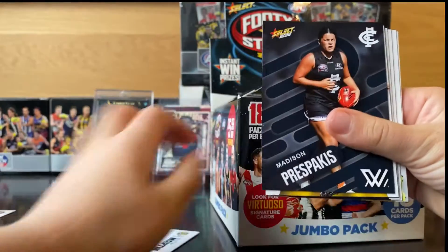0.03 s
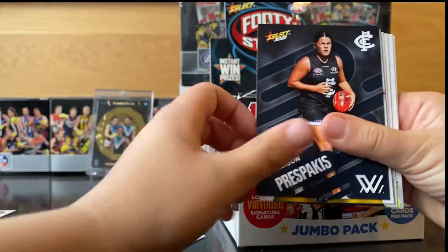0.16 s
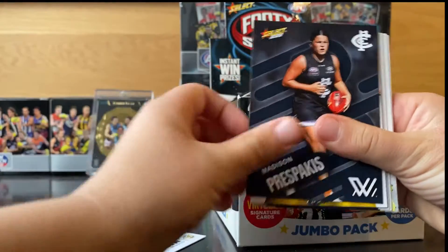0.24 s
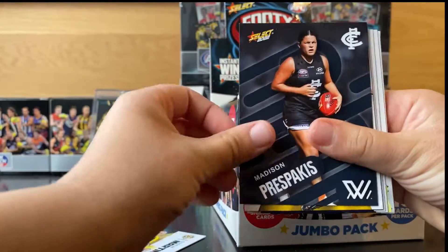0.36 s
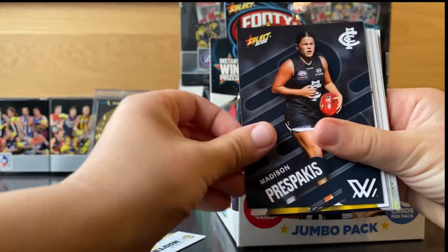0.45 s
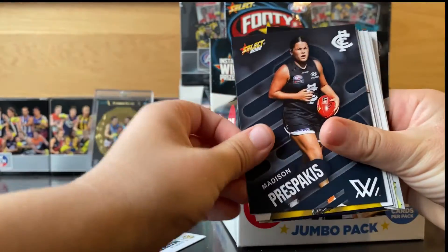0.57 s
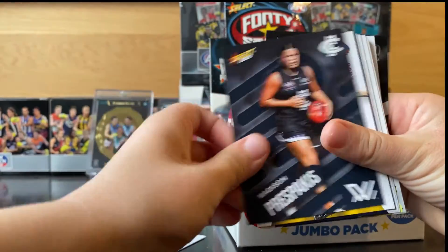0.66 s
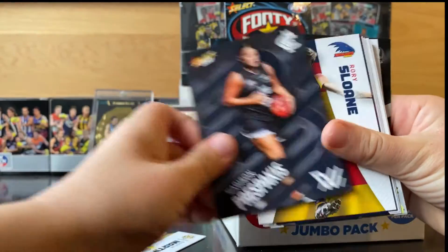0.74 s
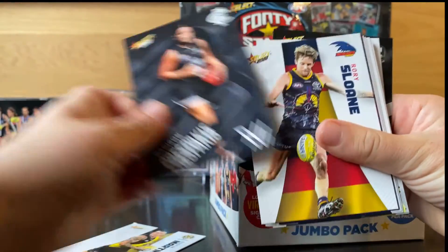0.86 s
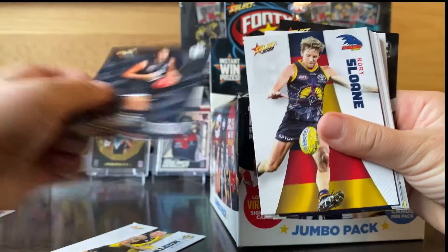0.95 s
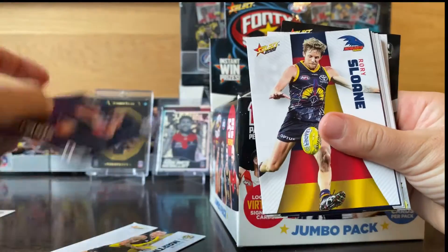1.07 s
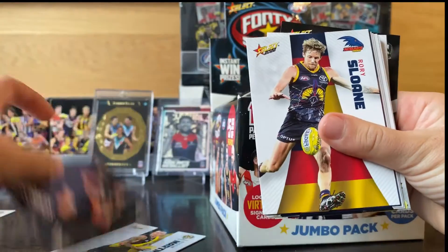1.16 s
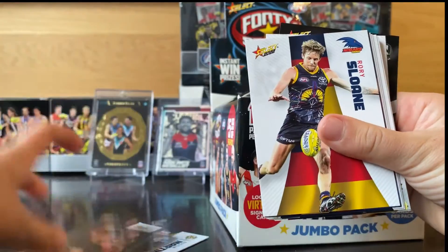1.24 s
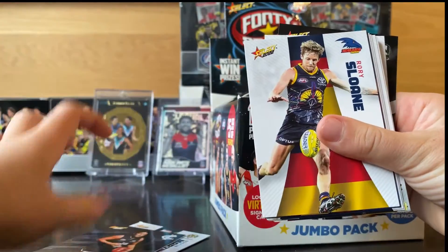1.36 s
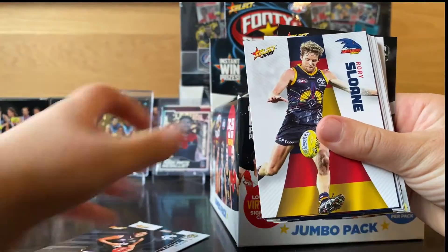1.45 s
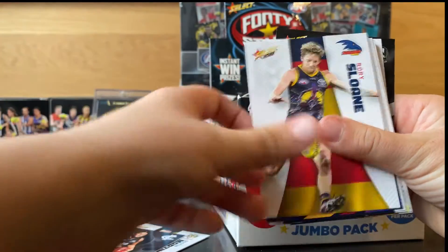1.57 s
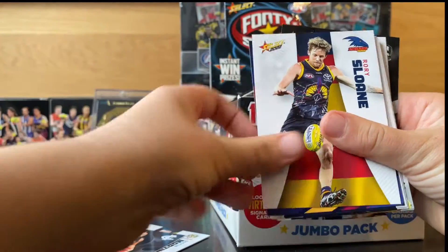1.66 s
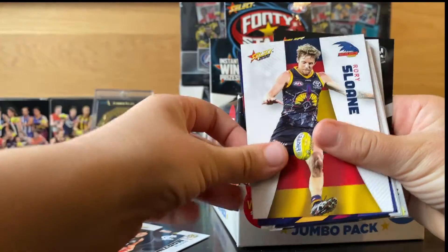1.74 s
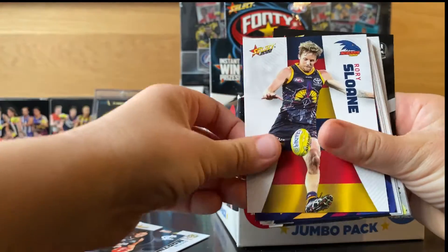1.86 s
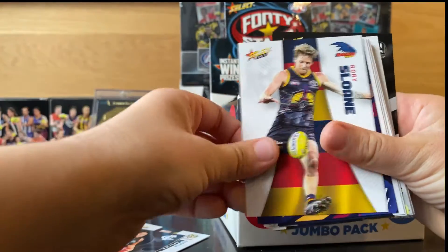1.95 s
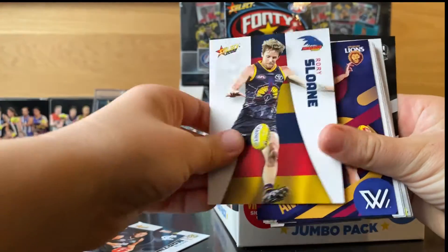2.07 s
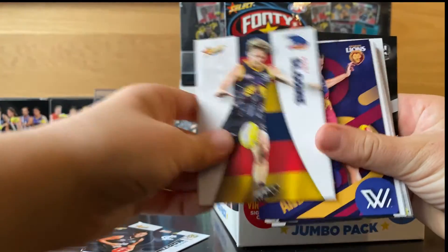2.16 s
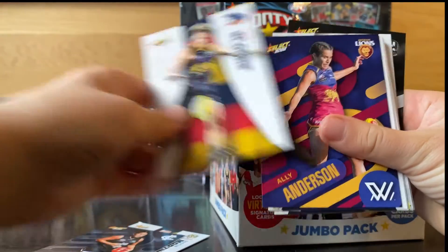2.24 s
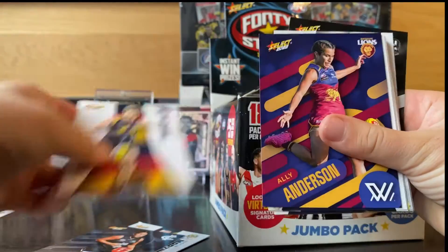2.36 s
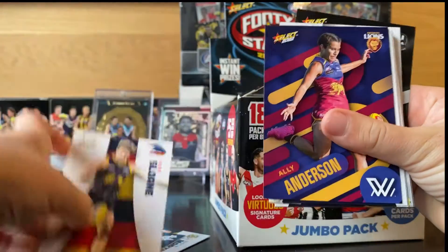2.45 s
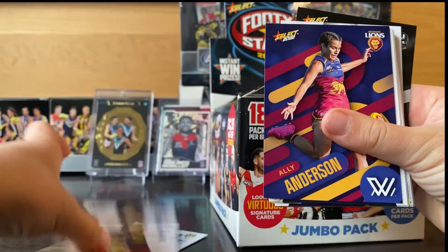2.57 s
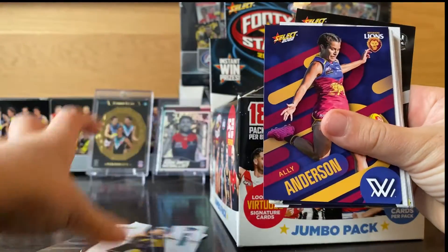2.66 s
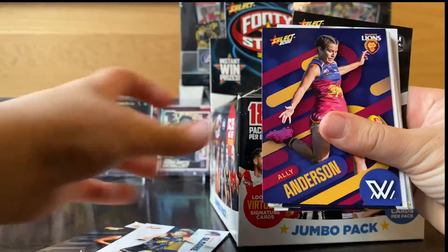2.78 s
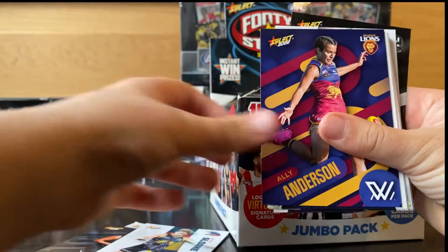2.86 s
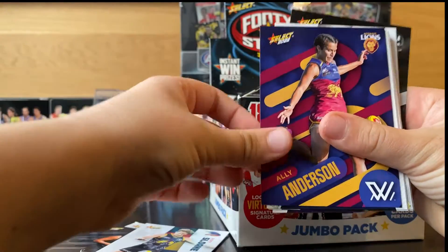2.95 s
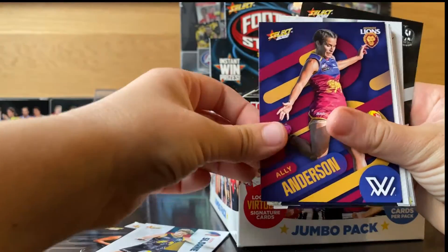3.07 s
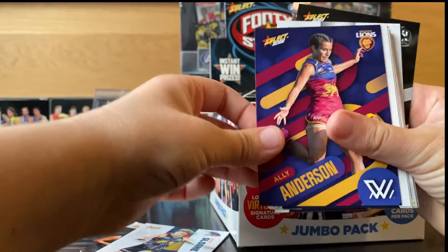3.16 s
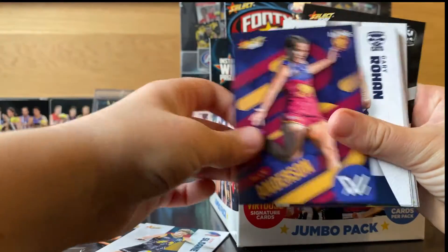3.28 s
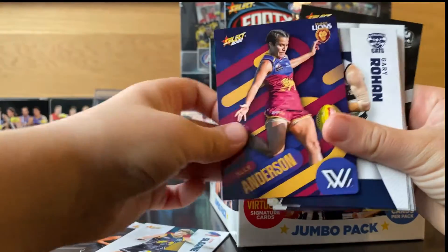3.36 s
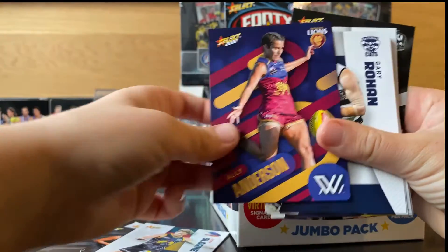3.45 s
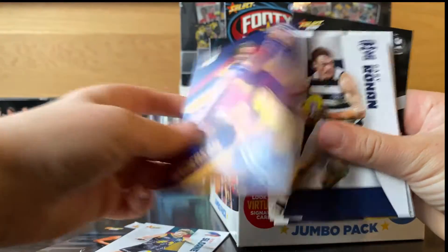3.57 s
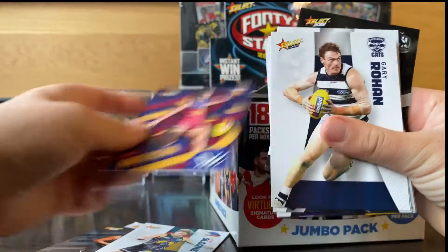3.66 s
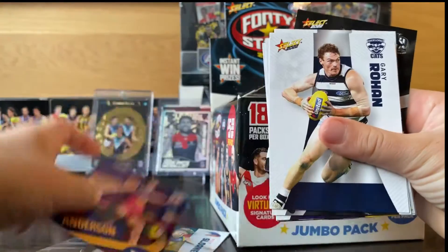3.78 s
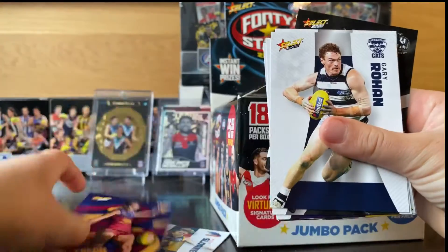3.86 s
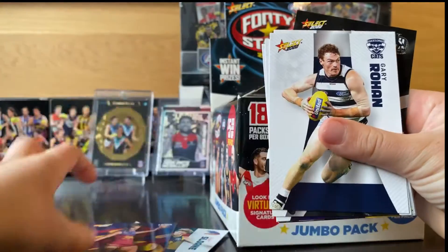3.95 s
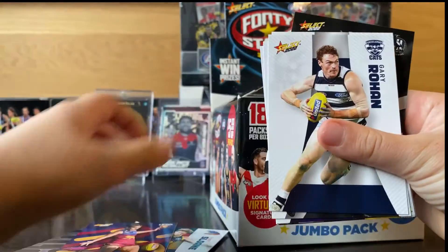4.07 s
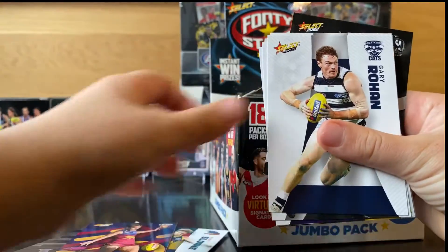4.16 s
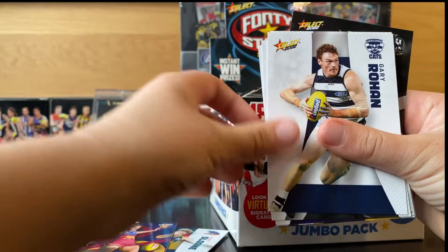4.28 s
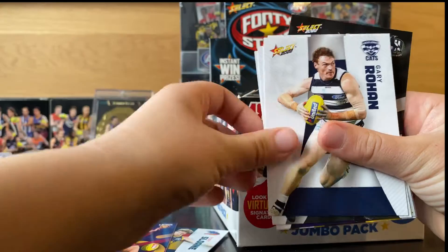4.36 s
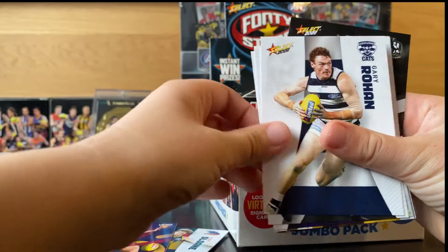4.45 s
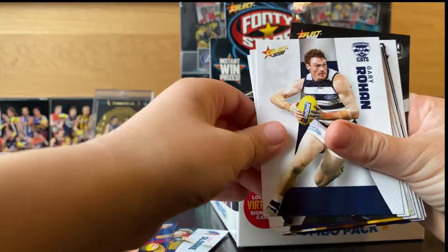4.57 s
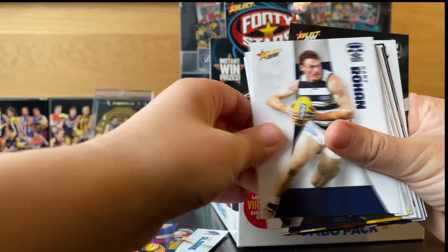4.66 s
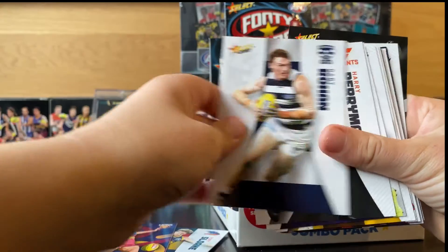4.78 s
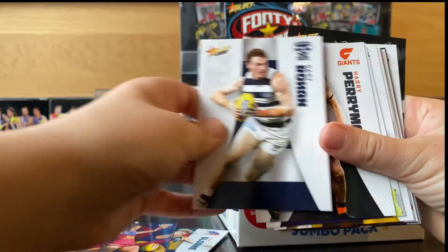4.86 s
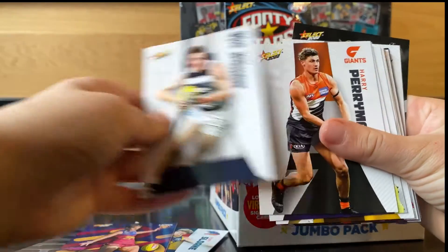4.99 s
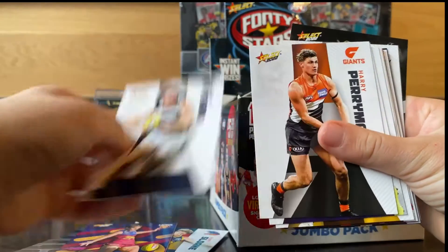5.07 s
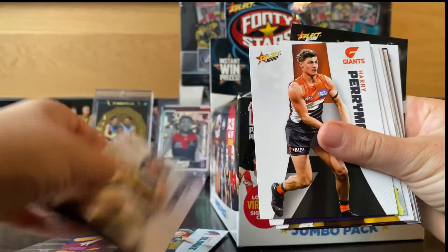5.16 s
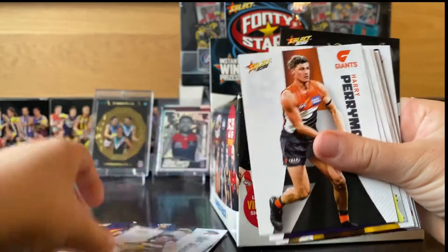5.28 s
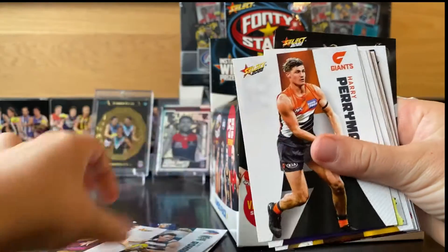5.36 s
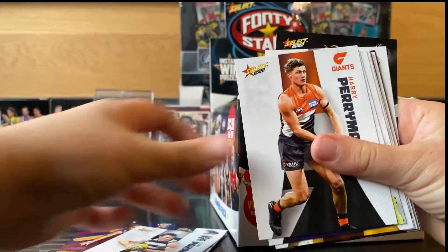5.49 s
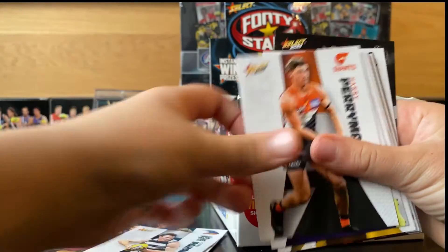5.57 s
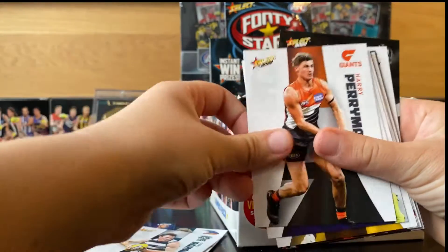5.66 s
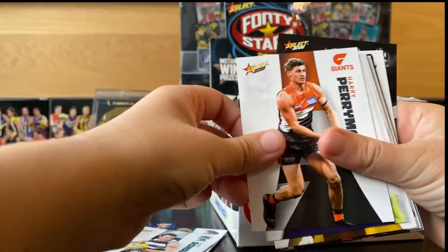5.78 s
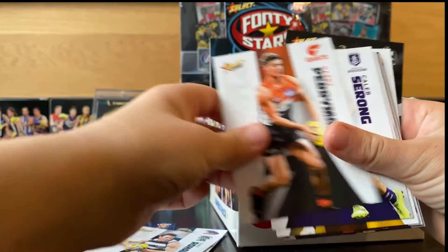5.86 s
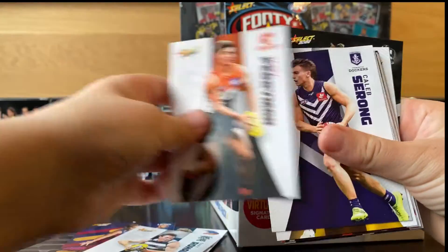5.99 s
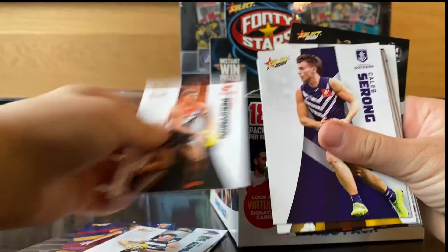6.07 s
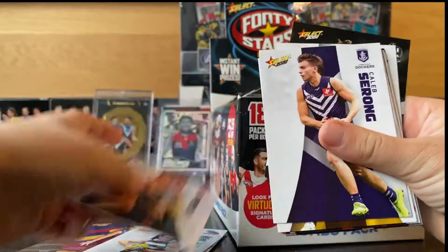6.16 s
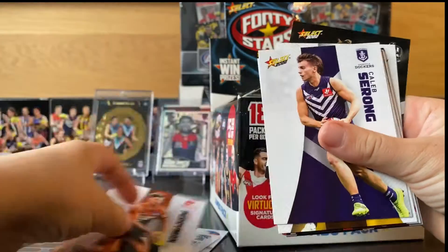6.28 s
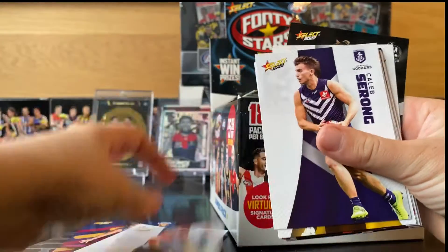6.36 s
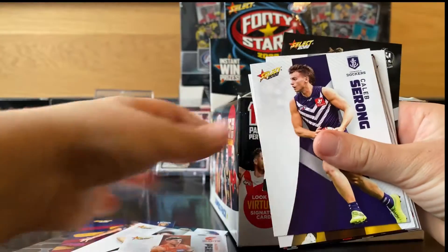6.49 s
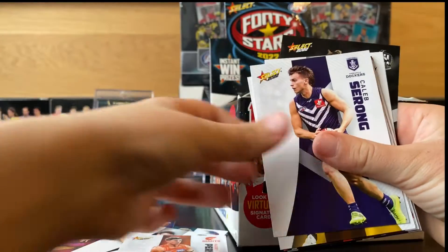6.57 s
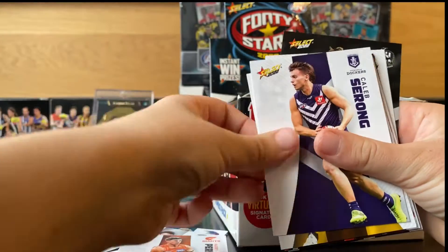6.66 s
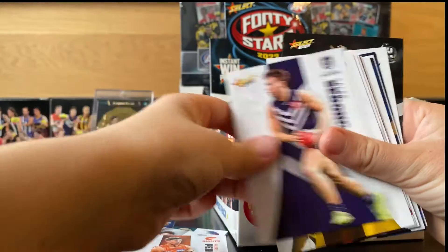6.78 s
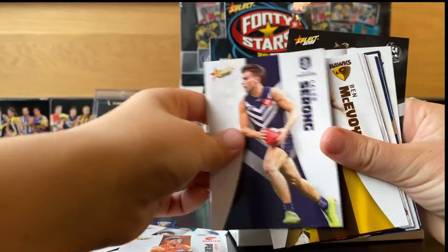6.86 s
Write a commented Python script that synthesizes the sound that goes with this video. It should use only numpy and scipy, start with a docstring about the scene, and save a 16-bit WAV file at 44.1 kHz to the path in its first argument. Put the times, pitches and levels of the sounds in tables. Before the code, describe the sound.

Close, dry card handling in a small room: short swishes, clicks and flicks, light table taps, over faint low rumble and air.

```python
"""Trading cards are drawn off a hand-held stack close to a phone in a small room, over rumble and air noise.
First a card slides (gated noise, partly through bending modes) and a thumb rubs (slips in one resonance).
A finger touches down, later cards land and bent edges snap (blows ring modes); faint noise bursts tick.
Dragged cards judder (noise in one narrow resonance) and edges zip (pressed grit rings a card), recurring.
The loudest snap comes past five seconds; near the end a knuckle bumps the table (a softened blow)."""
import sys
import numpy as np
from scipy import signal
from scipy.fft import rfft, irfft, next_fast_len
from scipy.io import wavfile
from scipy.ndimage import uniform_filter1d, map_coordinates

SR = 44100
rng = np.random.default_rng(int(sys.argv[2]) if len(sys.argv) > 2 else 0)


def int16_out(signal):
    """Quantize to a 16-bit WAV file."""
    q = np.round(np.clip(np.atleast_2d(signal).T, -1, 1) * 32767)
    wavfile.write(sys.argv[1], SR, q.astype(np.int16))


N = 305431

# Bent edges springing free:
# (time [s], relative level [dB], brightness = crack over body [dB], left-right scale [dB])
SNAPS = [(0.6147, -65, 1, 12), (1.0499, -56, 3.5, 17), (1.336, -43.5, 2, 10), (1.6507, -58, 2.5, 4),
         (2.6834, -49, -6, 2), (3.9278, -56.5, -0.5, 8), (4.007, -35.5, 1.5, 1.5), (4.0186, -54, 2, 6),
         (4.587, -56.5, 11.5, 1), (4.712, -49.5, -2, 4), (4.911, -56, -3.5, 5), (5.3486, -32.5, 7.5, 10),
         (5.3803, -40, 0, 4), (5.8398, -42.5, -2.5, 3.5), (5.956, -50.5, 0.5, 6), (5.9654, -53.5, 1.5, 6),
         (6.2183, -54, 9.5, 5), (6.4564, -40.5, 1.5, 1), (6.479, -50.5, 5.5, 5), (6.4874, -45, 4, 13),
         (6.8637, -57, -3.5, 0)]
# Resonances of a card: (frequency [Hz], width [Hz], level [dB])
CARD_MODES = [(290, 240, -12), (880, 150, -5), (1390, 420, -3), (2196, 190, 3.5), (3000, 270, -5),
              (3800, 400, -5), (4340, 390, -6.5), (5420, 380, -4.5), (6610, 680, -5), (9260, 1100, -5),
              (9800, 650, -5), (14300, 1100, -13)]
SNAP_CONTACT_S = 0.0022
LAYING_S = .16  # this long after a touch or landing, snaps act on the table
TABLE_KNOCK_DB, HAND_KNOCK_DB = -2.5, -14  # knock over body: on the table, in the hand


def snaps():
    """Impulsive excitation of modes: a freed edge slaps the stack, with more knock on a card just laid down."""
    out, t = np.zeros((2, N)), np.arange(SR // 10) / SR
    for s, db, bright_db, pan_db in SNAPS:
        on_table = any(0 < s - tap[0] < LAYING_S for tap in TAPS)
        knock_db = TABLE_KNOCK_DB if on_table else HAND_KNOCK_DB
        levels_db = [db + knock_db, db, db + bright_db]
        forces = blow(t, SNAP_CONTACT_S, chatter=1.57)
        modes = gripped(CARD_MODES, spread_db=2.5)
        add(out, s, at_phone(forces, modes, levels_db, pan_db, dry_db=-15.0))
    return amp(-1.14) * out


# Soft touches and landings: a finger's first touch, then cards meeting the table:
# (time [s], contact before stretching [s], relative level [dB], brightness = crack over body [dB])
TAPS = [(.243, .008, -66, -12), (1.096, 0.0063, -57.5, -14), (2.145, .005, -57.5, -13),
        (1.2714, 0.0035, -41.5, -9.5), (1.281, 0.0038, -45.5, -4.5), (2.5227, 0.0024, -35.5, -11),
        (2.639, 0.0073, -42.5, -4), (2.656, .005, -50.5, -4), (2.827, 0.0044, -60.5, -7.5),
        (3.759, 0.0062, -45.5, -15.5), (3.873, 0.0063, -49.5, -9), (5.099, 0.0017, -58, -2.5),
        (5.271, 0.004, -43, -12), (6.028, 0.0048, -54.5, -8), (6.035, 0.0055, -52.5, -4),
        (6.1475, 0.0038, -39.5, -1), (6.1736, 0.0055, -39.5, -7.5), (6.21, 0.012, -41, -5.5),
        (6.3062, 0.0042, -49.5, 0.5)]
# Resonances of the table top: (frequency [Hz], width [Hz], level [dB])
TABLE_MODES = [(140, 35, 0), (290, 70, -1), (435, 140, -3), (780, 110, 1.5), (914, 180, -2.5),
               (1090, 146, 3.5), (1470, 720, -1), (2180, 500, -1.5), (3430, 690, -10.5), (4500, 1000, -12),
               (7000, 2500, -28), (10500, 1800, -28)]
THUD_DB, THUD_GROWS = -45, 0.75  # knock equals body at this table level, and grows more slowly [dB per dB]
TAP_PAN_DB = 3.5


def taps():
    """Impact on a plate: a longer contact chatters more, and a softer touch or landing is mostly thud."""
    out, t = np.zeros((2, N)), np.arange(SR // 10) / SR
    for s, contact, db, bright_db in TAPS:
        thud_db = THUD_DB + THUD_GROWS * (db - THUD_DB)
        levels_db = [thud_db, db, db + bright_db]
        forces = blow(t, contact * 1.31, chatter=contact / 0.002)
        modes = gripped(TABLE_MODES, spread_db=3.5)
        add(out, s, at_phone(forces, modes, levels_db, TAP_PAN_DB, dry_db=-37.5))
    return amp(0.5) * out


# Edges scraping along edges:
# (time [s], nominal length [s], relative level [dB], brightness = crack over body [dB])
ZIPS = [(0.978, .015, -35.5, 2), (2.096, 0.0084, -46.5, -3), (2.281, 0.011, -48, -2.5),
        (2.3418, 0.025, -34.5, -1), (3.648, 0.0091, -40.5, -6.5), (3.708, .01, -55, -1),
        (3.975, 0.011, -43, -2), (6.222, 0.0088, -49.5, 5.5)]
ZIP_KNOCK_DB, ZIP_PAN_DB = -10.5, 6.5


def zips():
    """Friction excitation: edge runs along edge, pressing harder until it slips off."""
    out, t = np.zeros((2, N)), np.arange(SR // 10) / SR
    for s, length, db, bright_db in ZIPS:
        pressure = np.interp(t / length, [0, .1, .8, 1.05], [0, .55, 1, 0])
        stutter = amp(3 * wobble(450)[:len(t)])  # the edge catches and skips
        forces = two_ports(grit(t, spread_db=3), mono_hz=2000) * pressure * stutter
        modes = gripped(CARD_MODES, spread_db=1.5)
        levels_db = [db + ZIP_KNOCK_DB, db, db + bright_db]
        add(out, s, at_phone(forces, modes, levels_db, ZIP_PAN_DB, dry_db=-14.5))
    return amp(-0.7) * out


# The bending card in the hand: (frequency [Hz], width [Hz], level [dB])
FLEX_MODES = [(326, 410, -0.5), (737, 75, 5), (1080, 150, 0.5), (1450, 300, -0.5), (2200, 240, -2.5),
              (2868, 510, -12), (5130, 2700, -18)]
# Spectrum of fine paper hiss: (frequency [Hz], level [dB])
HISS = [(800, -37.5), (2500, 3.5), (3500, -1), (5500, 1.5), (7000, 2), (8200, -4.5), (10000, 4), (11300, 3),
        (12200, -20), (13000, -4), (14600, -3.5), (16000, -27)]
FLUTTER_PER_S, FLUTTER_S = 88, .0012  # a loose card flaps against the stack: rate, decay time
FLUTTER_DEPTH = 1.4  # a flap over the steady scrape


def slides():
    """Sliding friction: faces hiss, while catching grains and little flaps ring the bending card."""
    t = np.arange(N) / SR
    scrape_gain, hiss_gain = sliding(t)
    catch = unit(amp(1.5 * wobble(40) + 2 * wobble(380)))  # the surfaces catch and let go
    flaps = 1 + FLUTTER_DEPTH * jolts(FLUTTER_PER_S, FLUTTER_S)
    forces = grit(t, spread_db=5) * amp(1.9 * wobble(90)) * flaps
    flexing = patchy(ring(two_ports(forces, mono_hz=1500), FLEX_MODES), depth_db=3)
    scrape = amp(-1.85) * scrape_gain * flexing
    fine_noise = coloured(grit(t, spread_db=3.0), HISS, mono_hz=1502)
    hiss = amp(-2.0) * hiss_gain * patchy(fine_noise, depth_db=4)
    return catch * (scrape + hiss) * amp([[.8], [-.8]])  # left louder than right


# Cards sliding over card or table:
# (start [s], fastest [s], end [s], relative level [dB], relative brightness = hiss over scrape [dB])
STROKES = [(-.04, -0.007, 0.21, -53.5, -5), (0.735, 0.79, 0.86, -62, 1), (0.83, 0.86, 1.02, -56, 1),
           (.995, 1.01, 1.14, -59, -5), (1.632, 1.74, 1.874, -59.5, -5), (2.038, 2.074, 2.13, -57, -5.5),
           (2.13, 2.212, 2.27, -53, -12), (2.23, 2.277, 2.31, -48, -9), (2.36, 2.38, 2.44, -46, -6.5),
           (2.52, 2.54, 2.65, -50.5, -14), (2.58, 2.655, 2.72, -60, -8), (3.32, 3.34, 3.42, -63, -0.5),
           (3.62, 3.645, 3.74, -58, -4), (3.891, 3.944, 4.07, -52.5, -6), (4.74, 4.79, 4.88, -62, -7),
           (4.85, 4.995, 5.06, -51, -9), (5.096, 5.16, 5.24, -52, -13.5), (5.293, 5.338, 5.38, -40, -9),
           (5.8, 5.896, 6.1, -56.5, -2), (6.02, 6.083, 6.16, -55.5, 7.5), (6.14, 6.205, 6.25, -49.5, -5.5),
           (6.36, 6.4, 6.46, -48.5, -4), (6.814, 6.88, 7, -58.5, -4)]
SWELL_DB, FADE_DB, EASE_S = 17, 17, 0.0055  # rise and fall of a stroke; smoothing of its ends
# A freed card shivers on: relative start level, decay, relative hiss over scrape
RUSTLE_DB, RUSTLE_DB_PER_S, RUSTLE_HISS_DB = -25, 169.5, -8.5


def sliding(t):
    """Power summation of scrape and hiss: strokes swell and fade, and freed edges leave dying rustles."""
    power = np.zeros((2, N))
    for start, fastest, end, db, bright_db in STROKES:
        during = slice(*np.searchsorted(t, [start, end]))
        shape_db = np.interp(t[during], [start, fastest, end], [-SWELL_DB, 0, -FADE_DB])
        power[:, during] += (amp(shape_db) * amp([[db], [db + bright_db]])) ** 2
    dying = amp(RUSTLE_DB - RUSTLE_DB_PER_S * t[:SR // 4])
    freed = [(s, db, bright_db) for s, db, bright_db, _ in SNAPS]
    freed += [(s + length, db, bright_db) for s, length, db, bright_db in ZIPS]
    for s, db, bright_db in freed:
        levels_db = [[db], [db + bright_db + RUSTLE_HISS_DB]]
        add(power, s + EASE_S / 2, (dying * amp(levels_db)) ** 2)
    return uniform_filter1d(np.sqrt(power), max(round(EASE_S * SR), 1))


# A card judders as it drags: (start [s], end [s], pitch [Hz], relative level [dB])
JUDDERS = [(.767, 0.773, 2600, -55), (0.839, 0.852, 715, -52.5), (2.266, 2.296, 748, -46),
           (3.628, 3.647, 917, -46), (3.643, 3.662, 905, -43), (6.209, 6.219, 800, -36)]


def judders():
    """Stick-slip hoot: noise passes twice through one bending resonance and swells briefly."""
    out, t = np.zeros((2, N)), np.arange(SR // 10) / SR
    for start, end, hz, db in JUDDERS:
        length = max(end - start, .005)
        swell = np.sqrt(np.abs(np.sin(np.pi * np.clip(t / length, 0, 1))))
        noise = two_ports(grit(t, spread_db=4.5), mono_hz=2550)
        narrowed = ring(noise, [(hz, 260, 0)])
        tone = unit(ring(narrowed, [(hz, 420, 0)]))
        add(out, start, amp(db) * swell * tone)
    return out


# Faint ticks as cards catch and let go: (time [s], peak level [dB])
TICKS = [(0.663, -54.5), (1.66, -39.5), (1.951, -49), (3.475, -50), (4.424, -56), (4.857, -43),
         (4.924, -35.5), (5.71, -47.5), (5.936, -36.5), (6.333, -43), (6.746, -55.5), (6.834, -44.5),
         (6.844, -40.5)]


def ticks():
    """Non-resonant transients: tiny dry clicks, too light to ring the card."""
    out, t = np.zeros((2, N)), np.arange(SR // 50) / SR
    for s, db in TICKS:
        click = coloured(grit(t, spread_db=4.5), HISS, mono_hz=1495) * np.exp(-t / 0.0019)
        add(out, s, amp(db) * click / np.abs(click).max())
    return out


# A thumb drags on a glossy face: (start [s], end [s], resonance [Hz], relative level [dB])
RUBS = [(0.222, 0.297, 1780, -61), (0.293, 0.405, 1880, -62.5), (0.5, 0.603, 1830, -71),
        (0.755, 0.82, 1600, -68), (1.678, 1.732, 1860, -69), (1.771, 1.795, 1900, -59.5)]
# Spectrum of skin friction: (frequency [Hz], level [dB])
SKIN = [(150, 7), (400, -11.5), (900, -2), (1400, -1.5), (2500, -3), (3400, -19), (6300, -11),
        (12000, -26.5)]
# Skin lets go at an uneven rate: mean rate, decay of a slip, width of its resonance
SLIPS_PER_S, SLIP_S, RUB_WIDTH_HZ = 130, 0.0031, 640


def thumb():
    """Stick-slip friction: skin slips on the coating ring a resonance that shifts with the grip."""
    out = np.zeros((2, N))
    slips = unit(.9 + jolts(SLIPS_PER_S, SLIP_S))
    forces = slips * coloured(rng.standard_normal((2, N)), SKIN, mono_hz=2530)
    for start, end, hz, db in RUBS:
        drag = forces[:, round(start * SR):round(max(end, start + .01) * SR)]
        drag = drag * signal.windows.tukey(drag.shape[1], .2)
        rub = ring(drag, [(hz, RUB_WIDTH_HZ, 0)]) + amp(-9) * drag
        add(out, start, amp(db + 4.5) * unit(rub))
    return out


BUMP_S, BUMP_PAN_DB = 6.4298, 5.5  # the returning hand bumps the table once; left-right scale
# Levels of the bump: (knock [dB], body [dB], crack [dB])
BUMP_DB = [-28, -20.5, -44]
# The table under the hand: (frequency [Hz], width [Hz], level [dB])
BUMP_MODES = [(132, 22, 0), (293, 55, 3), (455, 50, -4), (711, 90, 2), (953, 230, -3), (1197, 130, 5.5),
              (1374, 120, 1), (1680, 290, -9.5), (2190, 260, -11)]
KNUCKLE_HZ = 1490  # skin cushions the knock above this


def bump():
    """Low-passed impact: a knuckle strikes the table with one clean, hollow knock."""
    out, t = np.zeros((2, N)), np.arange(SR // 10) / SR
    hard_blow = blow(t, contact=.0016, chatter=0.4)
    forces = filtered(hard_blow, lambda f: 1 / (1 + 1j * f / KNUCKLE_HZ))
    add(out, BUMP_S, at_phone(forces, BUMP_MODES, BUMP_DB, BUMP_PAN_DB, dry_db=-33))
    return out


# Knock, body and crack bands: (low edge [Hz], high edge [Hz])
BANDS = [(115, 600), (600, 2800), (2800, 16000)]
# Share of the left-right scale given to each side: (frequency [Hz], share [ratio])
SHADE = [(500, 0), (1000, 0.63), (2300, 0.57), (5000, 0.52), (8000, .02)]


def at_phone(forces, modes, levels_db, pan_db, dry_db):
    """Modal response and shadowing: forces ring a body, heard as low knock, middle body and high crack."""
    pair = ring(forces, modes) + amp(dry_db) * forces
    out = np.zeros_like(pair)

    def shade(f):
        """Diffraction: the phone's body shades the middle frequencies most."""
        return amp(along(SHADE, f) * pan_db * np.array([[1], [-1]]))

    for edges, db in zip(BANDS, levels_db):
        part = signal.sosfilt(signal.butter(3, edges, 'band', fs=SR, output='sos'), pair)
        part = unit(filtered(part / part.std(axis=1, keepdims=True), shade))
        # the level is energy spread over 10 ms
        out += amp(db) * part * np.sqrt(SR / 100 / part.shape[1])
    return out


def blow(t, contact, chatter):
    """Impulse and decaying chatter: one sharp push, then a brief rattle on what was met."""
    forces = two_ports(grit(t, spread_db=2.5), mono_hz=2500)
    forces *= np.exp(-2 * t / contact) * (1 - np.exp(-t / 0.00078))
    forces *= chatter / np.linalg.norm(forces, axis=1, keepdims=True)
    forces[:, 0] += 1
    return forces


def grit(t, spread_db):
    """Random microslip: paper fibres slip by uneven amounts, as two microphones hear them."""
    return rng.standard_normal((2, len(t))) * amp(spread_db * rng.standard_normal(len(t)))


def jolts(per_s, life_s):
    """Random impulse train: sudden pushes of uneven size, each decaying exponentially."""
    pushes = (rng.random(N) < per_s / SR) * np.minimum(rng.exponential(size=N), 2)
    return signal.lfilter([1], [1, -np.exp(-1 / (life_s * SR))], pushes)


def gripped(modes, spread_db):
    """Boundary dependence of modes: each grip or landing place alters their levels and slightly detunes them."""
    return [(hz * (1 + .015 * rng.standard_normal()), width, db + spread_db * rng.standard_normal())
            for hz, width, db in modes]


# Phase by which the left microphone leads: (frequency [Hz], phase [rad])
PORT_PHASE = [(60, 0.047), (350, .3), (1300, 1.35), (2300, 1.3), (4500, 1), (8000, 0)]


def left_leads(x):
    """Phase difference between receivers: the left microphone leads by a phase that rises and falls with
    frequency."""
    return filtered(x, lambda f: np.exp(1j * along(PORT_PHASE, f) * np.array([[.5], [-.5]])))


# Reverberation time: (frequency [Hz], time to decay 60 dB [s])
ROOM_T60 = [(100, 0.23), (400, 0.3), (1500, 0.28), (5000, 0.28), (10000, 0.24), (16000, 0.26)]
# Colour of the reverberation: (frequency [Hz], level [dB])
ROOM_COLOUR = [(100, 7), (500, 5.5), (1500, -1), (4000, 4.5), (7000, 1.5), (11000, -4.5), (16000, 1.5)]


def room(x, delay, wall_db):
    """Reverberation: faint start, a near wall's answer, diffuse tail; each side reaches both microphones."""
    hz, t, z = signal.stft(rng.standard_normal((2, 2, SR // 2)), SR, nperseg=256)
    fade = amp(along(ROOM_COLOUR, hz)[:, None] - 60 * t / along(ROOM_T60, hz)[:, None])
    tail = two_ports(signal.istft(z * fade, SR, nperseg=256)[1], mono_hz=900)
    after = np.arange(tail.shape[-1]) / SR - delay
    tail = tail * np.where(after < 0, .35, 1 + amp(wall_db) * np.exp(-np.abs(after) / 0.009))
    return signal.fftconvolve(x[None], tail / np.linalg.norm(tail[0]), axes=2).sum(axis=1)[:, :N]


# Course of the low rumble: (time [s], relative level [dB])
RUMBLE = [(0.0, -61.5), (0.55, -64.5), (1.02, -55.5), (1.59, -64.5), (2.58, -53), (4.11, -58.5),
          (5.34, -54), (5.59, -61), (6.17, -55), (6.9, -61)]
# Course of the room's air: (time [s], relative level [dB])
AIR = [(0.0, -65.5), (0.61, -73.5), (0.9, -67.5), (1.61, -70), (2.36, -62), (3.17, -65.5), (3.65, -63),
       (6.42, -62.5), (6.55, -67), (6.9, -67.5)]
# Spectrum of the rumble: (frequency [Hz], level [dB])
RUMBLE_SPECTRUM = [(15, -40), (30, -14), (47, -1.5), (60, -2.5), (80, -9.5), (120, -12.5), (200, -23),
                   (400, -37), (1000, -66.5)]
# Spectrum of the air: (frequency [Hz], level [dB])
AIR_SPECTRUM = [(60, -16), (150, 1), (260, 1.5), (330, -1), (430, 4.5), (600, -3.5), (740, 0.5),
                (1000, -4.5), (1400, -11), (2500, -18.5), (4000, -29.5), (6000, -27.5), (8000, -42.5),
                (11000, -42), (14000, -63.5), (16000, -81)]
RUMBLE_DB, AIR_DB = 3, 1.43  # added to the courses


def background():
    """Noise under slow modulation: low rumble and soft room air drift in level."""
    low_noise = coloured(rng.standard_normal((2, N)), RUMBLE_SPECTRUM, mono_hz=450)
    rumble = amp(curves(RUMBLE)[0] + RUMBLE_DB) * low_noise
    air_gain = amp(curves(AIR)[0] + AIR_DB + .6 * wobble(2.5))
    air_noise = coloured(rng.standard_normal((2, N)), AIR_SPECTRUM, mono_hz=1100)
    return rumble + air_gain * patchy(air_noise, depth_db=1.5)


def amp(db):
    """Logarithmic level: decibels to gain."""
    return 10 ** (np.asarray(db) / 20)


def unit(x):
    """Normalisation: scale to rms 1."""
    return x / np.sqrt(np.mean(x ** 2) + 1e-20)


def along(points, hz):
    """Interpolation of (frequency, value) points on a logarithmic axis."""
    f, v = np.transpose(points)
    return np.interp(np.log(hz + 1), np.log(f + 1), v)


def curves(rows):
    """Linear interpolation in time: one value per sample for each column after the time."""
    s, *cols = np.transpose(rows)
    return [np.interp(np.arange(N) / SR, s, c) for c in cols]


def wobble(rate):
    """Band-limited randomness: a smooth curve through this many random knots a second."""
    return map_coordinates(rng.standard_normal(int(N * rate / SR) + 4), [np.arange(N) * rate / SR])


def filtered(x, response):
    """Linear filtering: x times a complex response of frequency."""
    n = x.shape[-1]
    m = next_fast_len(n + SR // 10)
    return irfft(rfft(x, m) * response(np.fft.rfftfreq(m, 1 / SR)), m)[..., :n]


def ring(x, modes):
    """Modal superposition: x through a body's parallel resonances."""
    def response(f):
        """Sum of damped resonators."""
        return sum(amp(db) * 1j * f * w / (c * c - f * f + 1j * f * w) for c, w, db in modes)

    return filtered(x, response)


def two_ports(pair, mono_hz):
    """Spatial coherence: two unrelated signals to left and right, nearly alike well below mono_hz."""
    side = filtered(pair[1], lambda f: f / np.hypot(f, mono_hz))
    return np.array([pair[0] + side, pair[0] - side])


def coloured(pair, spectrum, mono_hz):
    """Spectral shaping: two noises to stereo of rms 1."""
    return unit(filtered(two_ports(pair, mono_hz), lambda f: amp(along(spectrum, f))))


def patchy(x, depth_db):
    """Time-varying spectrum: the colour of a noise shifts at random from moment to moment."""
    z = signal.stft(x, nperseg=512)[2]
    field = rng.standard_normal(z.shape[1:])
    field = uniform_filter1d(field, size=5, axis=0)  # smooth over frequency
    field = uniform_filter1d(field, size=9, axis=1)  # smooth over time
    return unit(signal.istft(z * amp(depth_db * unit(field)), nperseg=512)[1][:, :N])


def add(track, s, sound):
    """Superposition: mix a sound in at time s."""
    i = max(round(s * SR), 0)
    track[:, i:i + sound.shape[1]] += sound[:, :max(N - i, 0)]


def scene():
    """Superposition of direct sound, reverberation and background."""
    contacts = snaps() + taps() + bump() + zips()
    cards = left_leads(contacts + judders() + ticks() + slides() + thumb())
    return cards + amp(-12.5) * room(cards, delay=0.011, wall_db=-4) + background()


TOP_HZ = 15400  # corner of the roll-off


def record(dry):
    """Band limiting: a narrow dip in the treble, and a steep roll-off at the top."""
    def response(f):
        """Dip and low-pass magnitudes in series."""
        dip = amp(-13 * np.exp(-((f - 12200) / 420) ** 2))
        return dip / (1 + (f / TOP_HZ) ** 100)

    return filtered(dry, response)


dry = scene()
out = record(dry)
int16_out(out)
```